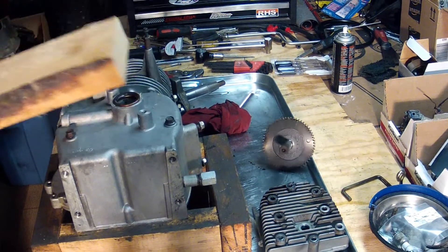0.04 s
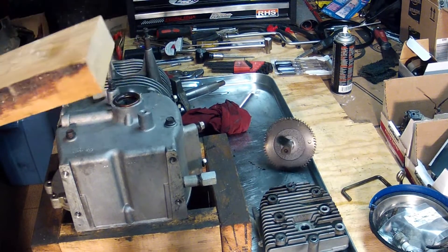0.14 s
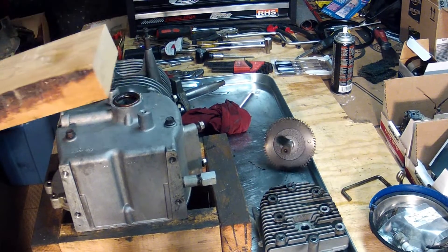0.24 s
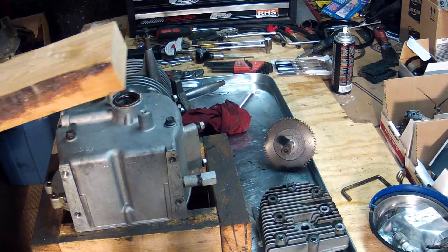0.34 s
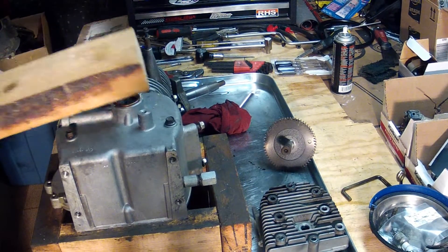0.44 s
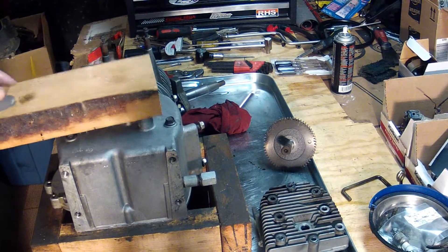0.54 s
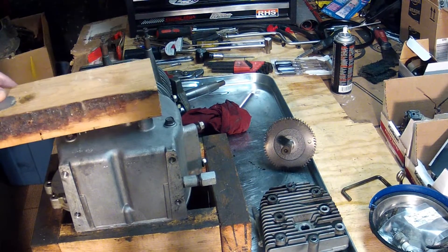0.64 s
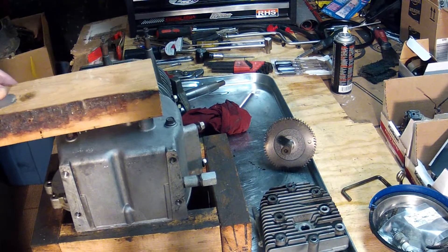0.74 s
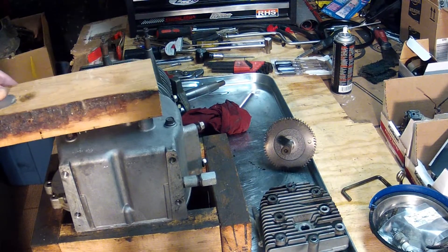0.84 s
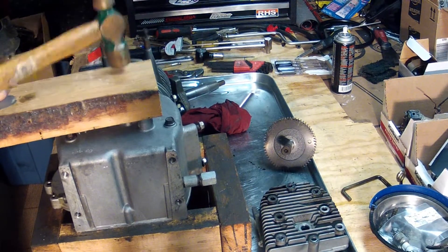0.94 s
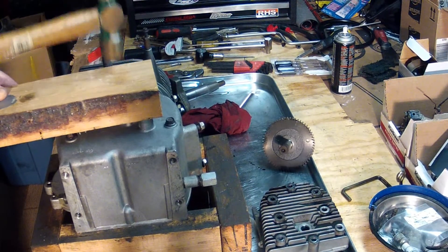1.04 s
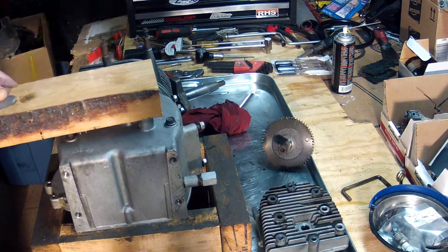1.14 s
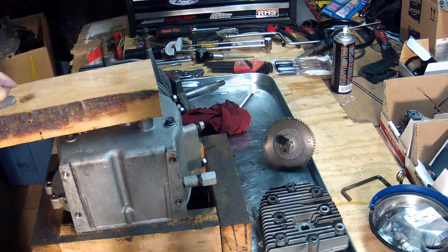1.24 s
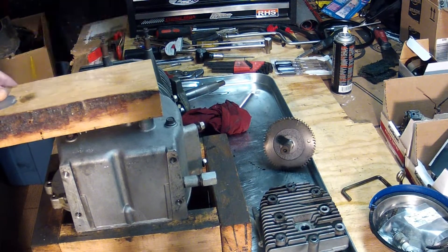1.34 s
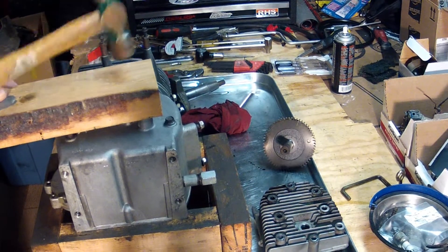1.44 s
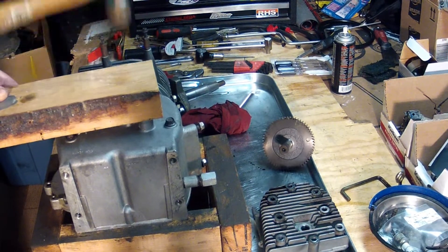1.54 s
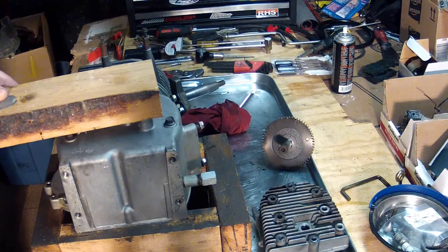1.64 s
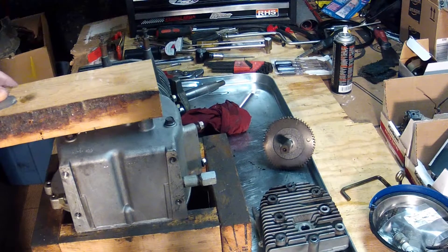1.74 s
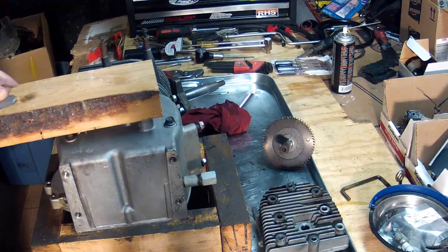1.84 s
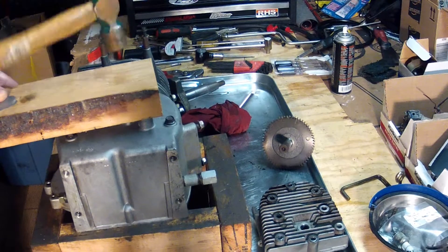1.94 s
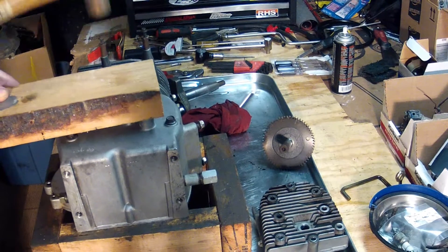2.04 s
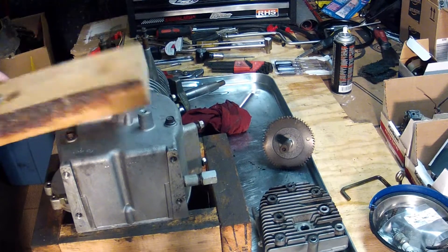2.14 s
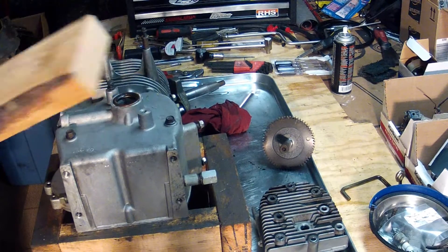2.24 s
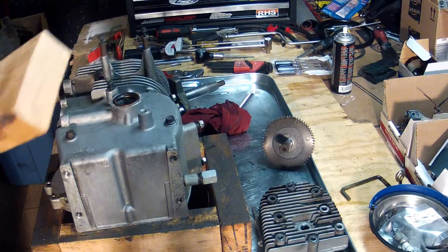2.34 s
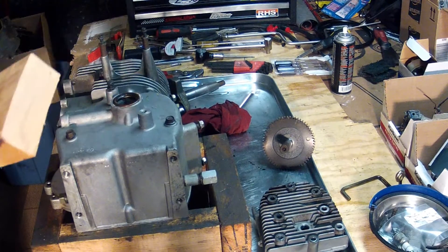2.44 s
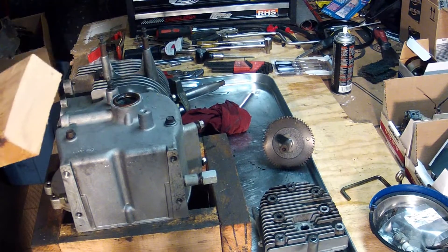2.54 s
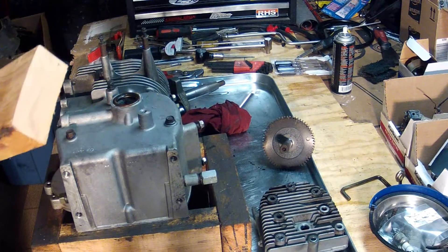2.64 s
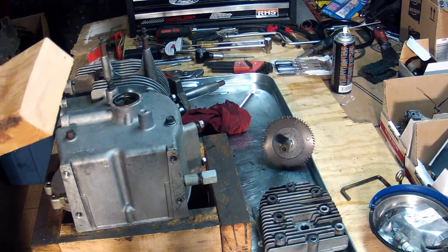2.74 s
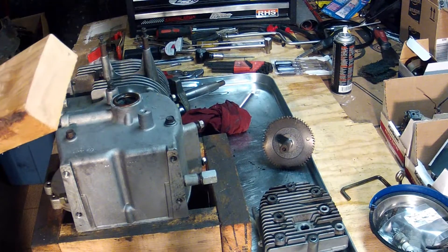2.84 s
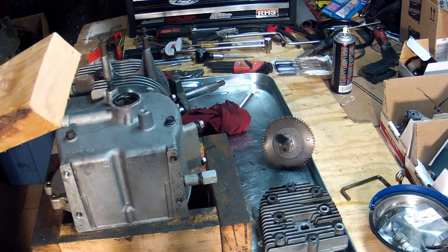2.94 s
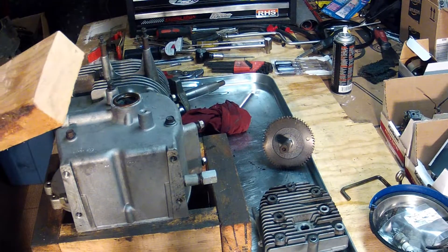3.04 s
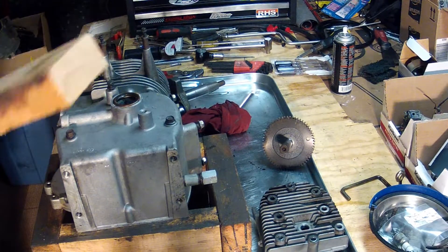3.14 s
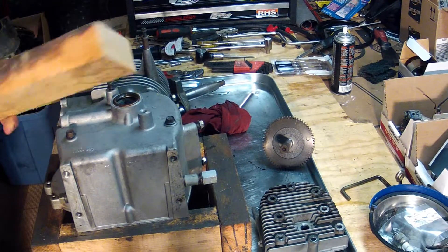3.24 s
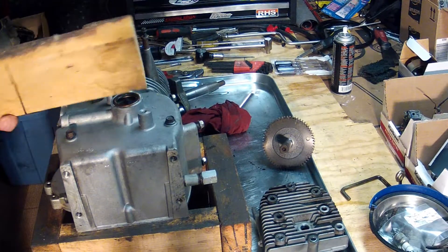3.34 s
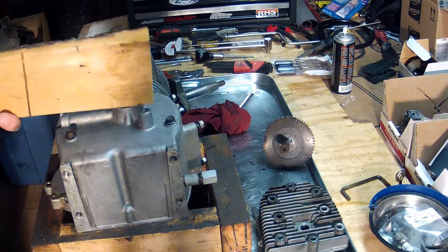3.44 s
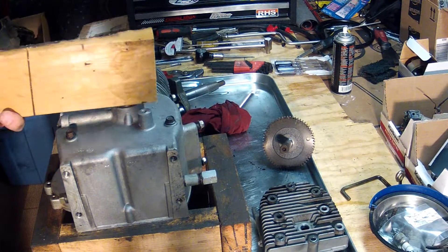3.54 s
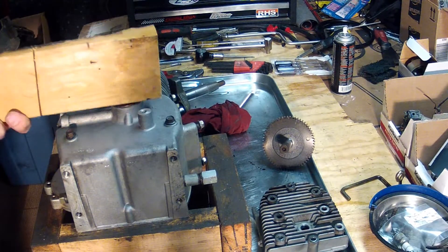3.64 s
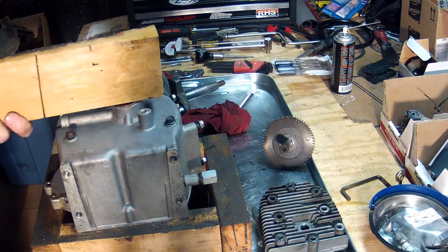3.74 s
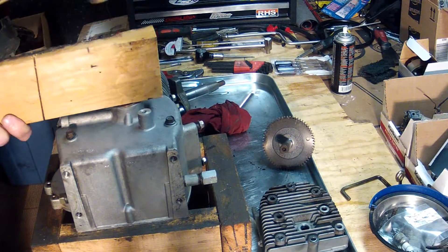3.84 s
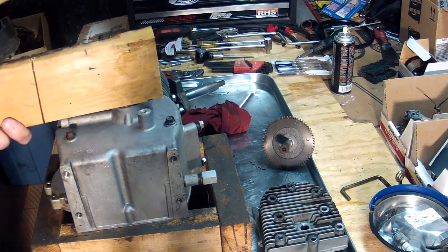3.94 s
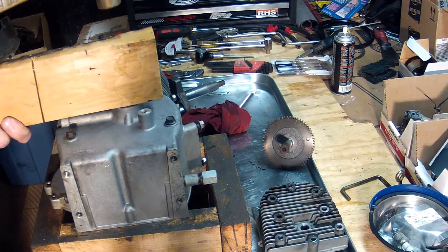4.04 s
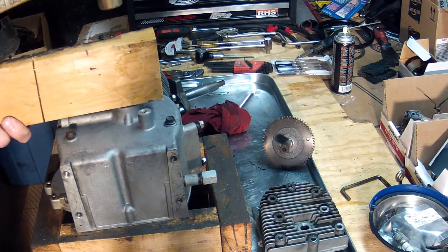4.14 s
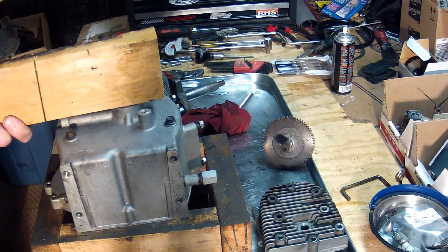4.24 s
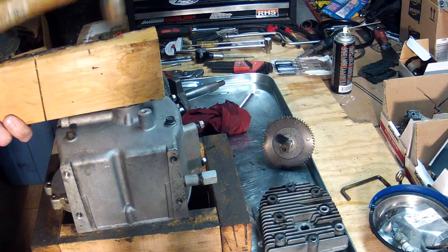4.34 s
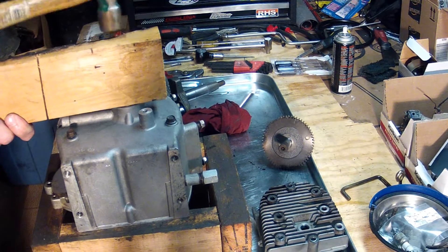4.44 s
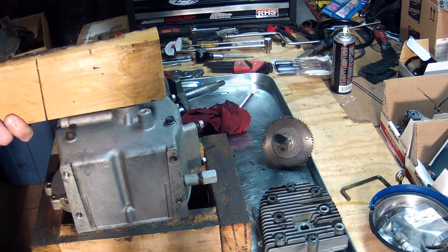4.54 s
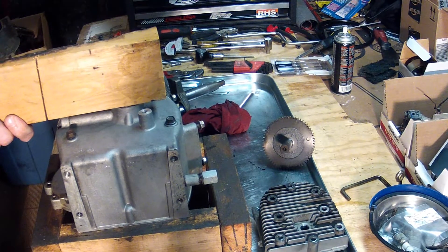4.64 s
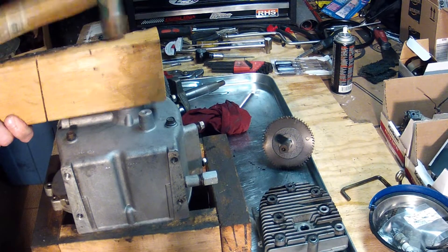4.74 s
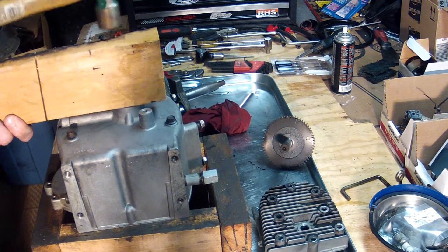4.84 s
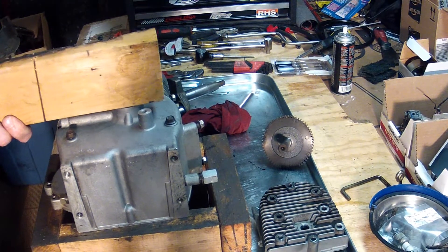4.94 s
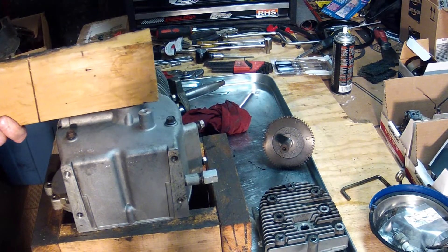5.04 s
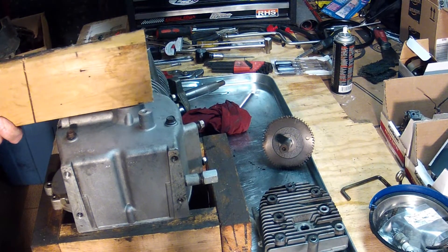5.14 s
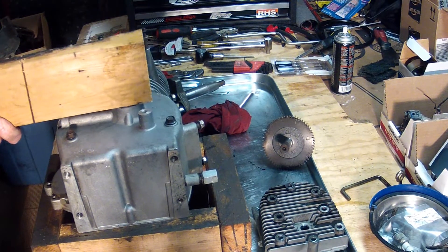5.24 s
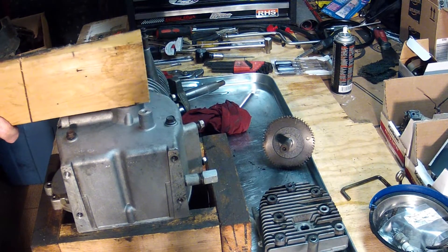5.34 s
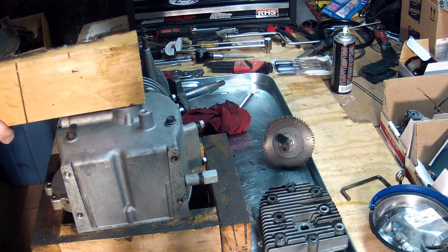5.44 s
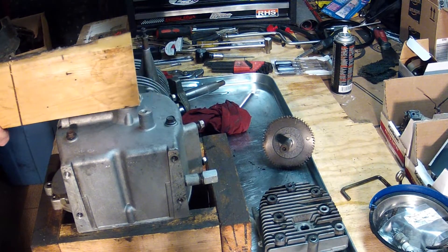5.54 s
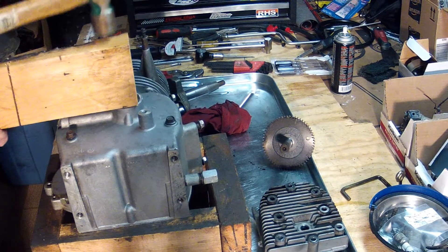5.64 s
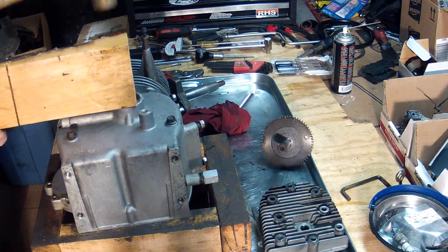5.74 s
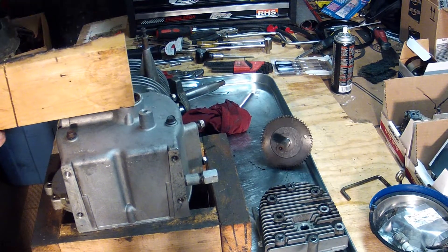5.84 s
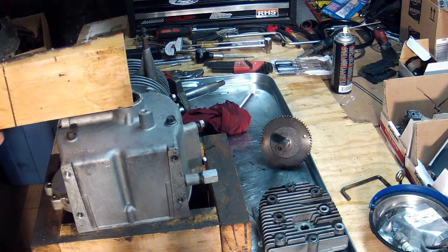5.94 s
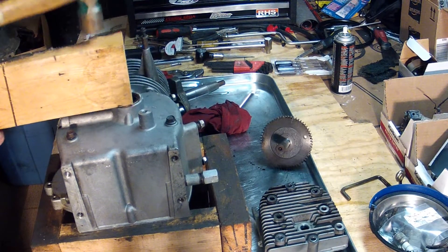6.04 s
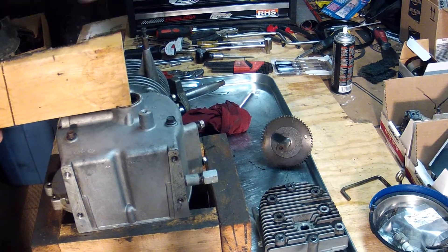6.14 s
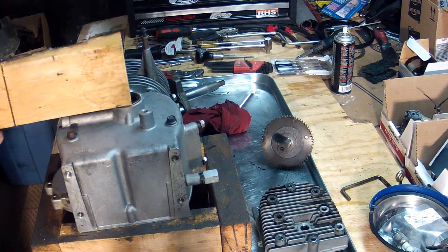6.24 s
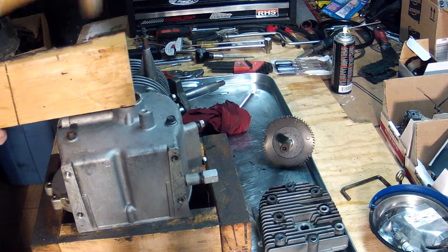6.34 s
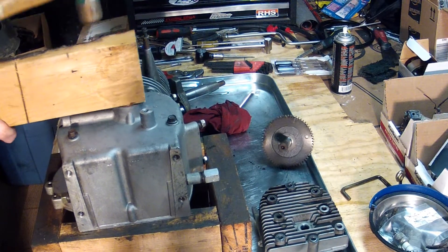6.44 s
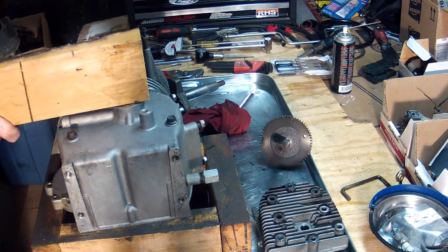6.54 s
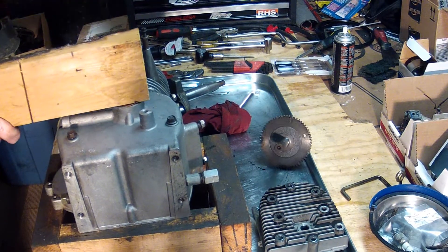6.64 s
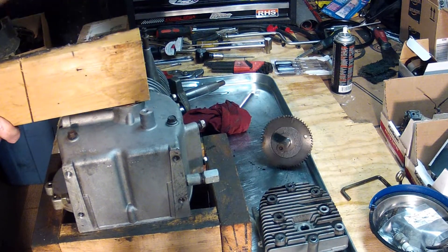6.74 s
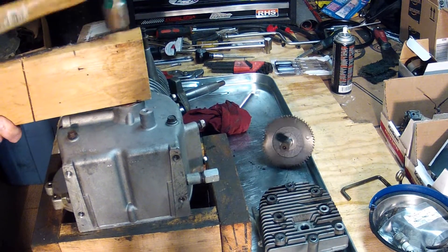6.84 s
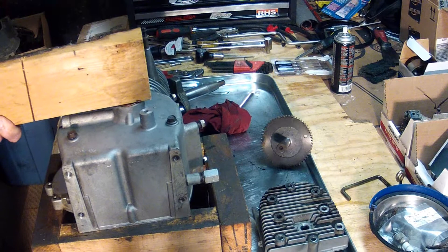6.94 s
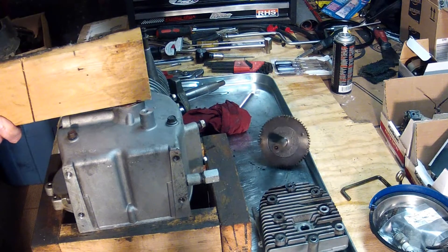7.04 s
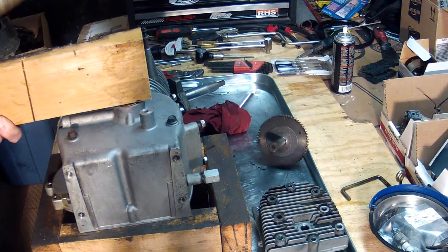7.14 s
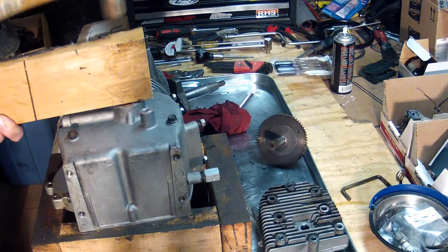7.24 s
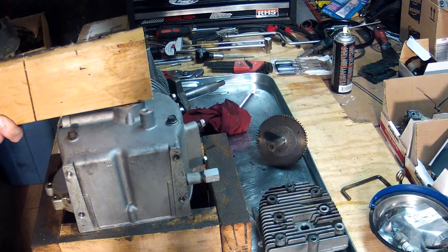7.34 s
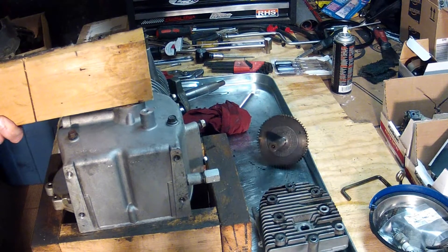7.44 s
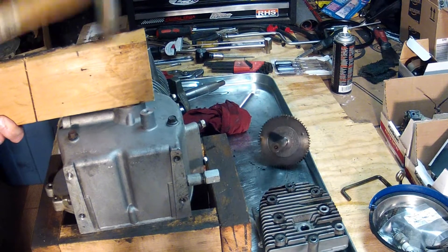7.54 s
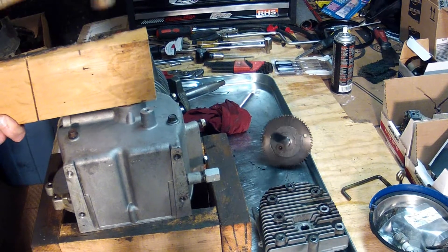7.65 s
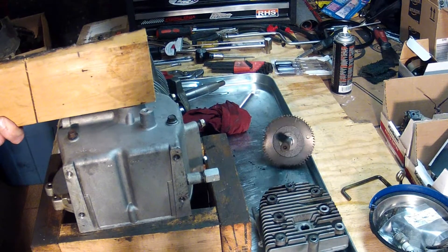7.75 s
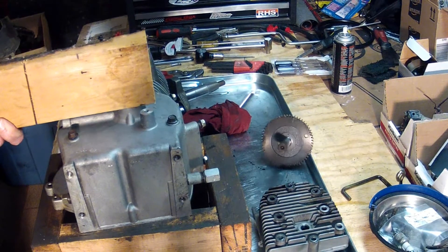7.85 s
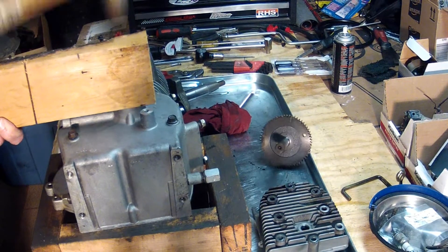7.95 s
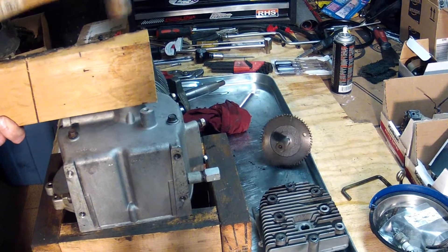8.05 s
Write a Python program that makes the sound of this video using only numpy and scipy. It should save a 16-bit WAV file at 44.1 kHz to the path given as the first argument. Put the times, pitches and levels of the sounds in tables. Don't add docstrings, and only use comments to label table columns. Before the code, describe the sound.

A fading hammer blow opens, then a wooden block thumps and scuffs on a metal casting. Three hard knocks follow, half a second apart, each ringing the casting and buzzing loose parts. After a quieter gap and a soft set-down, two blows, a pause, then a regular run of knocks. Small, lightly reverberant workshop; close microphone overloading and ducking after every hit.

```python
import sys
import numpy as np
from scipy import signal
from scipy.fft import rfft, irfft, next_fast_len
from scipy.io import wavfile

SR = 44100
rng = np.random.default_rng(int(sys.argv[2]) if len(sys.argv) > 2 else 0)


def ratio(d):
    e = np.asarray(d, float) / 20
    return 10 ** e


def store_wav(level_fs):
    pcm = np.round(np.clip(np.atleast_2d(level_fs), -1, 1) * 32767)
    wavfile.write(sys.argv[1], SR, pcm.T.astype(np.int16))


N = 357210
LEAD = 11025
M = N + 2 * LEAD

# start_s, level_db, hardness_db, settling_t60_s
BLOWS = [(-.16, 13.5, -4, 0.38), (1.053, 16.5, 0, 0.24), (1.5438, 19, 1, 0.29), (2.0215, 16.5, 4.5, .35),
         (4.4921, 11, -5, .14), (4.877, 16, -5.5, .17), (5.7601, 10, 1.5, .21), (6.1416, 11, 1.8, 0.22),
         (6.5080, 10, 0, 0.21), (6.9201, 13, 0.3, .25), (7.3103, 15, -2.17, 0.2), (7.6857, 12.5, 3.05, .34),
         (8.0984, 15, -2.6, .2)]
# pitch_hz, width_hz, level_db
WOOD_FLAT = [(318, 43, -2.5), (705, 480, -11), (1006, 23, -14.5), (1360, 52, -23.5), (1618, 36, -10.5),
             (1983, 37, -10.5), (2125, 53, -11.5), (2715, 58, -37), (3818, 240, -25), (4250, 120, -34),
             (5260, 110, -46.5)]
# pitch_hz, width_hz, level_db
WOOD_EDGE = [(276.8, 17, -3), (561.6, 220, -5.5), (826, 64, -18), (1214, 47, -16), (1762, 150, -22.5),
             (2266, 61, -8.5), (2690, 35, -10.5), (2826, 61, -13.5), (3330, 73, -24), (3915, 73, -16.5),
             (5100, 340, -40.5)]
# pitch_hz, flat_block_level_db, turned_block_level_db,
# decay_t60_s
CASTING_AND_BENCH = [(73.3, -17.5, -17.5, 0.39), (133, -19.5, -22, 0.16), (259.07, -12, -19.5, 0.14),
                     (272, -2, -6, 0.11), (292.4, -1, 0, 0.08), (349.6, -9.5, -5, 0.15), (555, -12.5, -12.5, 0.31),
                     (635, -13.5, -9.5, 0.053), (785, -16, -9.5, 0.21), (871.7, -20, -14.5, 0.057),
                     (1077, -26, -28, 0.37),
                     (1730, -12.5, -23.5, 0.16), (1752, -23.5, -13.5, .18), (2145, -17, -20, 0.14),
           (2285, -12, -30, 0.14), (2766, -15, -15.5, 0.099), (2890, -21, -23.5, 0.45),
           (3124, -20, -16.5, 0.23), (3657, -27.5, -35.5, 0.21), (3655, -24.5, -23.5, .15),
           (3890, -21.5, -21.5, 0.42), (4590, -24.5, -34.5, 0.24), (4610, -29.5, -29, 0.13),
           (4910, -25, -35.5, 0.45)]
# pitch_hz, level_below_blow_db, decay_t60_s
LOOSE_STEEL = [(1760, -36, .25), (2285, -34, .28), (2686, -31, .27), (3790, -41, .28), (4490, -39, .31),
               (4900, -48, .42)]
# pitch_hz, density_db (per Hz)
RATTLE_FLAT = [(88, -42.5), (150, -13), (204, -18.5), (273, -6), (383, -5.5), (753, -7.5), (1210, -19.5),
               (2310, -9.5), (3290, -13.5), (3900, -16.5), (5900, -28), (7670, -66), (13000, -120)]
# pitch_hz, density_db (per Hz)
RATTLE_EDGE = [(88, -32), (150, -13.5), (204, -25), (282, -3), (407, -7), (656, -9), (1530, -16.5),
               (2740, -7.5), (3190, -15.5), (5060, -23), (5900, -42.5), (7670, -68.5), (13000, -120)]
# start_s, weight_db, scuff_db
HANDLING = [(.226, -34, -37.5), (0.291, -41.5, -45.5), (0.37, -44.5, -58), (.419, -47, -50),
            (0.652, -33.5, -39.5), (.671, -24.5, -52.5), (0.691, -37, -95), (.72, -32, -71),
            (0.734, -47, -66), (.761, -36, -65), (1.884, -46.5, -49), (2.268, -36, -33),
            (2.391, -46.5, -45.5), (3.301, -64, -65), (3.792, -20.5, -45), (3.842, -32.5, -57),
            (3.869, -69, -73), (3.964, -50, -75), (3.999, -44.5, -81), (4.782, -52, -43),
            (5.191, -50, -41.5), (5.333, -57, -48.5), (5.467, -49, -68.5), (5.677, -56.5, -59.5),
            (6.08, -43.5, -61), (6.405, -39, -60.5), (6.461, -41, -53), (6.824, -52, -52.5),
            (7.262, -61, -66), (7.587, -33, -46)]
# pitch_hz, density_db (per Hz)
SCUFF = [(240, -40), (400, -3), (769, -13), (910, -17.5), (1230, -16.5), (1460, -16), (2680, -11),
         (3600, -22), (4300, -19), (5900, -35.5), (7670, -65), (13000, -120)]
# pitch_hz, density_db (per Hz)
THUD = [(24, -43.5), (40, -12), (135, -18), (270, 2), (377, -8.5), (758, -12.5), (960, -20), (1140, -47),
        (1500, -34.5), (1950, -70), (3300, -120)]
# pitch_hz, level_db, decay_t60_s
SOFT_BENCH = [(68, -12.5, 0.51), (538, -10.5, .1), (638, -10.5, 0.033), (796, -15, 0.06),
              (1470, -34.5, .08), (1770, -20.5, 0.11), (2680, -26.5, 0.15), (4370, -35, .08)]
# pitch_hz, decay_t60_s
ROOM_T60 = [(60, 0.67), (250, 0.48), (1000, 0.45), (3000, 0.41), (6000, 0.5)]
ROOM_EDGES = 25 * 2 ** np.arange(0, 8.1, 1 / 3)
# pitch_hz, density_db (per Hz)
SHOP = [(12, -50.5), (20, -11.5), (128, 0), (148, -3.5), (401, -10.5), (441, -12), (900, -22), (2330, -25),
        (2630, -25.5), (4030, -26.5), (5900, -31), (7670, -55), (13000, -120)]
# pitch_hz, density_db (per Hz)
HISS = [(12, -32.5), (20, 0), (249, 0), (762, -11.5), (4880, -13), (5900, -19), (7670, -63.5),
        (13000, -120)]

TURNED_S = 3
REBOUND_S = 0.023
STRIKE_SPREAD_DB = 1.5


def in_hz(points, hz):
    table_hz, values = np.transpose(points)
    return np.interp(np.log(hz), np.log(table_hz), values)


def filtered(x, order, hz, kind):
    return signal.sosfilt(signal.butter(order, hz, kind, fs=SR, output="sos"), x)


def block_is_flat():
    return np.arange(M) < LEAD + TURNED_S * SR


def clicks(times, sizes):
    out = np.full(M, 1e-18)
    out[np.round(np.asarray(times) * SR).astype(int) + LEAD] = sizes
    return out


def ring(x, hz, t60):
    radius = ratio(-60 / (t60 * SR))
    angle = 2 * np.pi * hz / SR
    return signal.lfilter([0, np.sin(angle)], [1, -2 * radius * np.cos(angle), radius * radius], x)


def coloured(spectrum, white):
    size = next_fast_len(len(white))
    hz = np.maximum(np.arange(size // 2 + 1) * SR / size, 1)
    out = irfft(rfft(white, size) * ratio(in_hz(spectrum, hz)), size)[:len(white)]
    return out / np.sqrt(np.mean(out ** 2))


def grains(per_s, spread_db):
    sizes = ratio(spread_db * np.minimum(rng.exponential(1, M), 4))
    sizes = sizes * rng.choice([-1, 1], M)
    return sizes * (rng.random(M) < per_s / SR)


def dying(times, dbs, t60s, rise_s):
    out, t = np.zeros(M), np.arange(SR) / SR
    for start, db, t60 in zip(times, dbs, t60s):
        i = round(start * SR) + LEAD
        envelope = ratio(db - 60 * t / max(t60, .02)) * (1 - np.exp(-t / rise_s))
        out[i:i + SR] += envelope[:max(M - i, 0)]
    return out


def crack(s, blow_db, hard_db):
    return rng.standard_normal(M) * dying(s, blow_db + hard_db - 11, np.full(len(s), .03), rise_s=0.0029)


def wood(s, blow_db, hard_db):
    out = 0
    for modes, used in ((WOOD_FLAT, s < TURNED_S), (WOOD_EDGE, s >= TURNED_S)):
        for k, (hz, width, db) in enumerate(modes):
            tilt_db = hard_db * np.log2(hz / 500) / 2
            chance_db = 2.0 * rng.standard_normal(len(s))
            size = ratio(blow_db + db + tilt_db + chance_db) * used
            size = size * (-1) ** k * np.sqrt(width / 100)
            out = out + ring(clicks(s + 0.57 / hz, size), hz, 2.0 / width)
    return out


def casting_and_bench(s, dbs, shaking, shake_db):
    longest_t60_s = .12
    out, flat = 0, block_is_flat()
    for k, (hz, flat_db, edge_db, t60) in enumerate(CASTING_AND_BENCH):
        size = ratio(dbs + STRIKE_SPREAD_DB * rng.standard_normal(len(s))) * (-1) ** k
        push = clicks(s + 0.54 / max(hz, 200), size) + ratio(shake_db) * shaking
        landing = np.roll(clicks(s, size), round(REBOUND_S * SR))
        push = push + ratio(-5) * landing
        out = out + ring(push * np.where(flat, ratio(flat_db), ratio(edge_db)), hz, min(t60, longest_t60_s))
    return out


def steel(s, blow_db):
    out = ring(clicks(s, ratio(-49.5)), 5272, 1.1)
    for hz, db, t60 in LOOSE_STEEL:
        size = ratio(blow_db + db + STRIKE_SPREAD_DB * rng.standard_normal(len(s)))
        out = out + ring(clicks(s + .004, size), hz, t60)
    return out


def loose_parts(contacts, shake, jolt):
    buzz = np.where(block_is_flat(), coloured(RATTLE_FLAT, contacts), coloured(RATTLE_EDGE, contacts))
    jingle = filtered(contacts, 2, [3600, 5400], "band")
    return buzz * shake + ratio(3) * jingle * jolt


def hammer():
    s, blow_db, hard_db, settling_t60 = np.transpose(BLOWS)
    usual_settling_s = .21
    seated = np.log2(np.maximum(settling_t60, .05) / usual_settling_s)
    ring_db = 4.34 + 13 * seated
    rattle_db = 12.5 - 6.5 * seated
    contacts = grains(per_s=9000, spread_db=2)
    contacts = contacts / contacts.std()
    jolt = dying(s + REBOUND_S, blow_db + ring_db - 29.0, np.full(len(s), .09), rise_s=0.018)
    shake = dying(s, blow_db + rattle_db - 26.5, settling_t60, rise_s=0.021) + jolt
    metal = casting_and_bench(s, blow_db + ring_db - 24, shaking=contacts * shake, shake_db=-32.5)
    struck = ratio(-4.5) * wood(s, blow_db, hard_db) + crack(s, blow_db, hard_db)
    return struck + metal + steel(s, blow_db) + loose_parts(contacts, shake, jolt)


def shop_air():
    return ratio(-60) * coloured(SHOP, rng.standard_normal(M))


def thump(s, thump_db, thump_hz):
    out, t = np.zeros(M), np.arange(SR // 2) / SR
    for start, db, hz in zip(s, thump_db, thump_hz):
        i = round(start * SR) + LEAD
        swing = ratio(db + 0.5 - 60 * (t / .12) ** 2) * (1 - np.exp(-t / 0.0078))
        out[i:i + SR // 2] += (swing * np.sin(2 * np.pi * hz * t))[:M - i]
    return out


def handling():
    s, thump_db, scuff_db = np.transpose(HANDLING)
    landed_s = s + .002
    slides_above_db, slide_span_db = -9.5, 5
    sliding = 1 / (0.5 + np.exp((slides_above_db - scuff_db + thump_db) / slide_span_db))
    resting_hz, sliding_hz = 277, 308
    thump_hz = resting_hz + (sliding_hz - resting_hz) * sliding
    contacts = grains(per_s=7000, spread_db=2)
    out = coloured(SCUFF, contacts) * dying(s, scuff_db - 0.5, np.full(len(s), .16), rise_s=.002)
    out = out + coloured(THUD, contacts) * dying(s, thump_db + 1.5, np.full(len(s), .1), rise_s=0.0027)
    out = out + thump(landed_s, thump_db, thump_hz)
    knock = np.hypot(ratio(thump_db + 0.3), ratio(scuff_db + 11))
    for hz, db, t60 in SOFT_BENCH:
        chance_db = 2.0 * rng.standard_normal(len(s))
        out = out + ring(clicks(landed_s, knock * ratio(db - 6.5 + chance_db)), hz, t60)
    return out


def room(x):
    t, echo = np.arange(SR) / SR, 0
    for low, high in zip(ROOM_EDGES, ROOM_EDGES[1:]):
        band = filtered(rng.standard_normal(SR), 2, [low, high], "band")
        echo = echo + band * ratio(-60 * t / in_hz(ROOM_T60, np.sqrt(low * high)))
    echo = echo * np.clip((t - .006) / 0.0087, 0, 1)
    return signal.fftconvolve(x, echo / np.sqrt(np.sum(echo ** 2)))[:M]


def scene():
    near = filtered(hammer() + handling(), 2, 45, "high")
    mid = near + ratio(-15.0) * room(near) + shop_air()
    hiss = ratio(-78.5) * coloured(HISS, rng.standard_normal(M))
    return (mid + hiss * [[1], [-1]])[:, LEAD:LEAD + N]


def gain_control(x, top_db, start_db, power, release, attack_s, step_db):
    over_db = np.maximum(20 * np.log10(np.abs(x).max(axis=0) + 1e-9) - top_db, 0)
    over_db[0] = start_db
    drain = release * np.arange(N) / SR
    held = np.maximum.accumulate(ratio(power * over_db) + drain) - drain
    held_db = 20 * np.log10(held) / power
    r = np.exp(-1 / (attack_s * SR))
    cut_db = signal.lfilter([(1 - r) ** 2], [1, -2 * r, r * r], held_db - start_db) + start_db
    return ratio(-step_db * np.round(cut_db / step_db))


def offset_swing(gain):
    swing = filtered(gain[0] - gain, 1, 20, "high")
    return filtered(swing, 2, 450, "low") * [[.15], [-.23]]


def sample_and_hold(x):
    at = np.arange(0, N, SR / 12000)
    slow = np.clip([np.interp(at, np.arange(N), channel) for channel in x], -.98, .98)
    held = signal.resample_poly(np.repeat(slow, 4, axis=1), 147, 160, axis=1)[:, :N]
    return signal.sosfiltfilt(signal.cheby2(10, 30, 15500, fs=SR, output="sos"), held)


def roll_off(x):
    return signal.sosfilt(signal.butter(12, 16210, fs=SR, output="sos"), x)


def record(dry):
    gain = gain_control(dry, top_db=-6, start_db=5.4, power=.38, release=6.6, attack_s=.003, step_db=.5)
    x = filtered(dry * gain + offset_swing(gain), 4, 5600, "low")
    mix = np.clip(sample_and_hold(x), -1, 1)
    return roll_off(mix)


dry = scene()
out = record(dry)
store_wav(out)
```